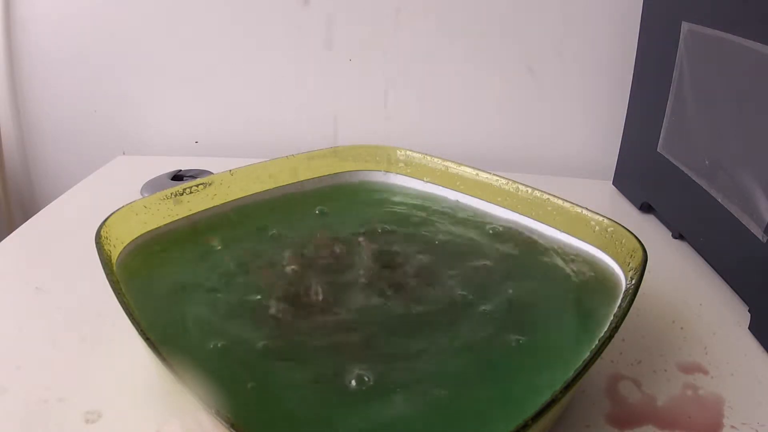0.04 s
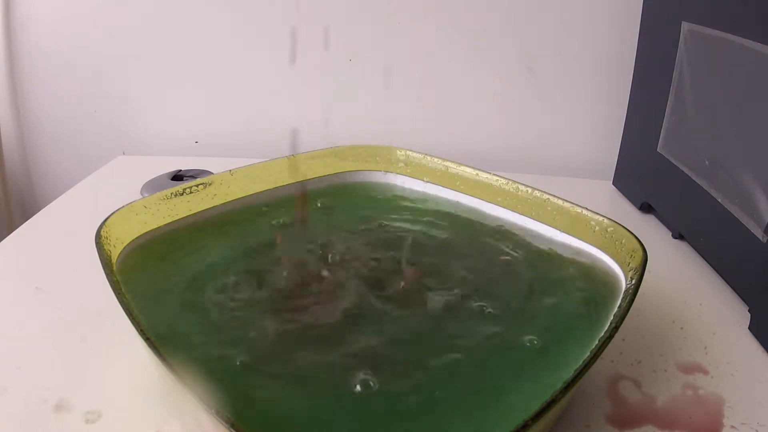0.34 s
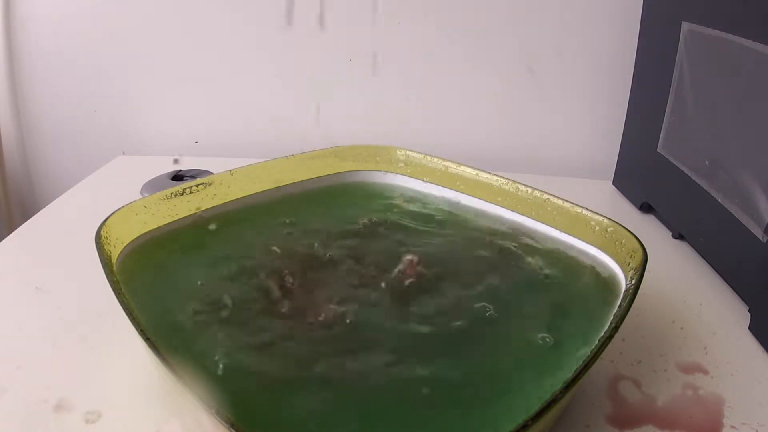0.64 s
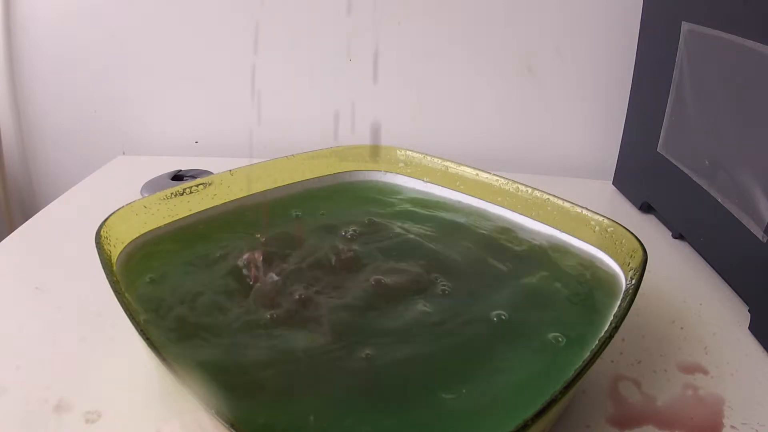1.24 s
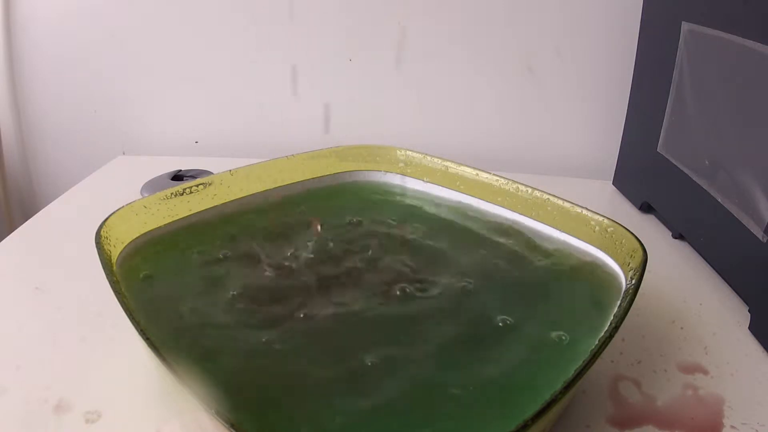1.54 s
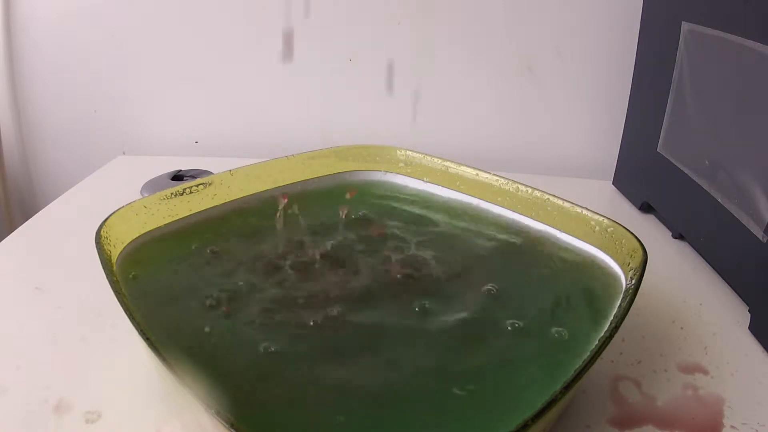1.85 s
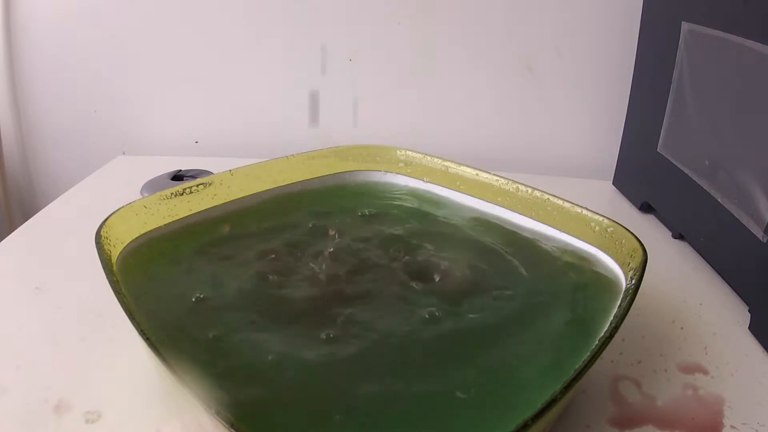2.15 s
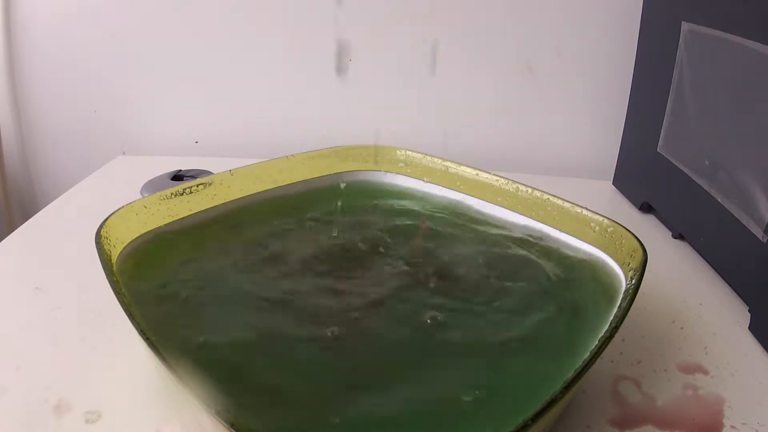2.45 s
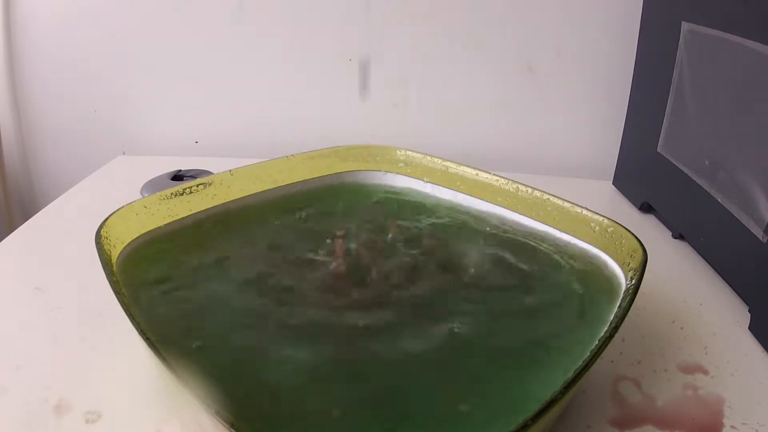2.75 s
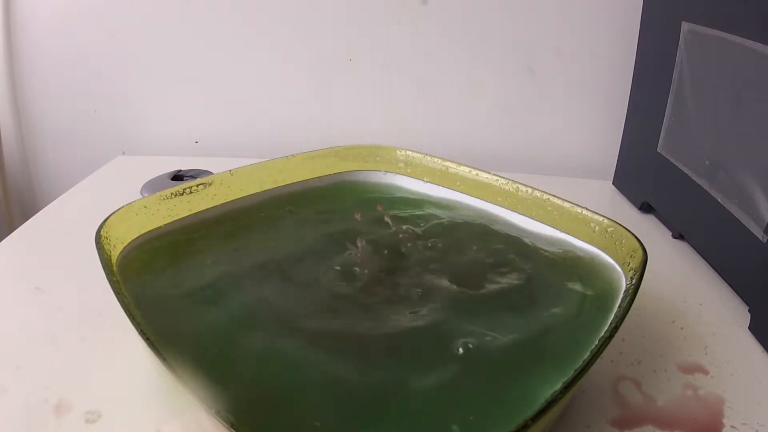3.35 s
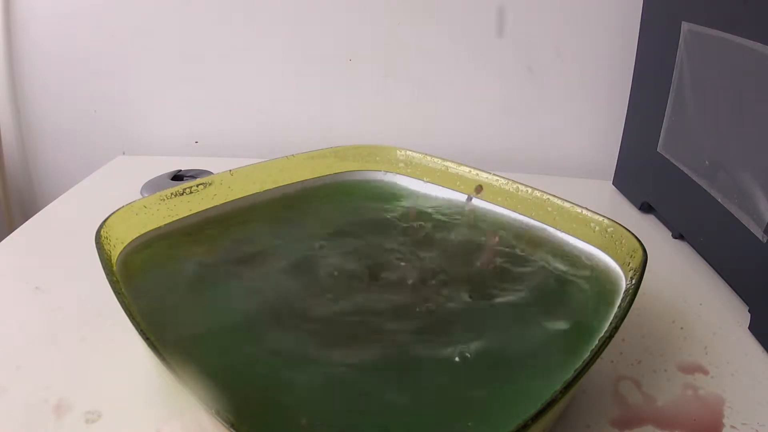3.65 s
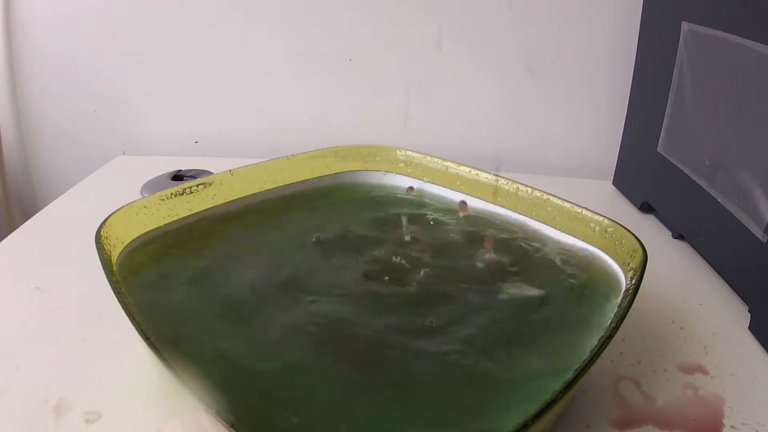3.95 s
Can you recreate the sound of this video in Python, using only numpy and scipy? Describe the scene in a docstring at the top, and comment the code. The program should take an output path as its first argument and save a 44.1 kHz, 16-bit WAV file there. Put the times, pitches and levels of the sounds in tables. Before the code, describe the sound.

Water drops fall into a filled plastic bowl throughout the four seconds, making irregular ticks and short, high plips, many rising in pitch. At about 0.9 seconds one drop hits sharply, much louder, briefly ringing the bowl. Lighter drips continue, standing out near 1.2, 1.9, 2.5 and 2.8 seconds, with fainter plips from splashed droplets between them. The small room rumbles and hisses faintly underneath.

```python
"""Water drops fall into a filled plastic bowl on a table in a small room; one drop hits hard.
Each impact ticks and rings the bowl. Many drops trap an air bubble that plips, its pitch mostly
rising as it nears the surface, and splashed droplets fall back with fainter plips.
The room rumbles and hisses faintly. The recorder holds its samples at a low rate,
which mirrors every plip into the treble."""
import sys
import numpy as np
from scipy import signal
from scipy.fft import rfft, irfft, next_fast_len
from scipy.io import wavfile
from scipy.ndimage import map_coordinates

SR = 44100
rng = np.random.default_rng(int(sys.argv[2]) if len(sys.argv) > 2 else 0)


def wav_out(sig):
    """Save sig, one row per channel (or a flat mono array), as 16-bit PCM at SR to the path in sys.argv[1]."""
    wavfile.write(sys.argv[1], SR, np.round(np.clip(np.atleast_2d(sig).T, -1, 1) * 32767).astype(np.int16))


N = 176400  # 4 seconds


def amp(db):
    """Turn decibels into a factor to multiply a sound by."""
    return 10 ** (np.asarray(db) / 20)


def unit(x):
    """Scale a sound so that its average strength (rms) is 1."""
    return x / np.sqrt(np.mean(x ** 2) + 1e-20)


def gain_at(points, hz):
    """Read the gain at hz from a curve of (frequency [Hz], level [dB]) points."""
    freqs, levels = np.transpose(points)
    return amp(np.interp(np.log(hz + 1), np.log(freqs + 1), levels))


def filtered(x, response):
    """Turn each frequency of x up or down by the gain response(hz)."""
    n = x.shape[-1]
    padded = next_fast_len(n + 8192)
    return irfft(rfft(x, padded) * response(np.fft.rfftfreq(padded, 1 / SR)), padded)[..., :n]


def add(track, start_s, sound):
    """Mix a sound into the track at the given time."""
    part = track[max(round(start_s * SR), 0):][:len(sound)]
    part += sound[:len(part)]


# How wide the room noise is: (frequency [Hz], side level compared with the middle [dB])
NOISE_WIDTH = [(30, -64), (90, -75.5), (180, -41.5), (350, -19), (700, -16), (1500, -13.5), (5000, -7.5)]

def room_noise(spectrum, db):
    """Noise with the given tone colour and level, nearly the same in both ears."""
    middle, side = filtered(rng.standard_normal((2, N)), lambda hz: gain_at(spectrum, hz))
    side = filtered(side, lambda hz: gain_at(NOISE_WIDTH, hz))
    return amp(db) * unit(np.array([middle + side, middle - side]))


# The rumble's tone colour: (frequency [Hz], relative level [dB])
RUMBLE_COLOUR = [(12, -26), (22, -19), (31, -10), (41, 7.5), (50, -6.5), (62, -21.5), (76, -2), (84, -9),
                 (93, -0.5), (110, -9), (144, 0.5), (170, -9), (205, -22.5), (270, -23.5), (305, -21),
                 (340, -26.5), (600, -36), (1000, -46.5), (2000, -56)]
# How loud the rumble is: (time [s], level [dB])
RUMBLE_LOUDNESS = [(0.0, -40), (0.03, -41), (0.28, -46.5), (0.36, -43), (1.08, -46.5), (1.12, -38),
                   (1.18, -47.5), (2.02, -43.5), (2.41, -49), (2.43, -46.5), (3.29, -44), (3.45, -48.5),
                   (3.65, -43.5), (4.0, -44.5)]

def rumble():
    """The room's low rumble, wavering in level."""
    level_db = np.interp(np.arange(N) / SR, *np.transpose(RUMBLE_LOUDNESS))
    return room_noise(RUMBLE_COLOUR, level_db)


# The hiss's tone colour: (frequency [Hz], relative level [dB])
HISS_COLOUR = [(100, -1), (600, 3.5), (1200, 2.5), (2400, -0.5), (4000, -4), (5300, -8), (5900, -15.5),
               (6100, -66)]

def hiss():
    """The room's faint, steady hiss."""
    return room_noise(HISS_COLOUR, db=-70.5)


def in_room(x, echoes_db=-16.5, tail_db=-15, tail_fade_s=0.22):
    """The direct sound, nine echoes off the table and walls, and a short, dull tail."""
    t = np.arange(SR // 4) / SR
    # A fade time, here and below, is how long a sound takes to drop by 60 dB.
    tail = rng.standard_normal(len(t)) * amp(-60 * t / tail_fade_s) * (1 - np.exp(-t / 0.002))
    tail = signal.lfilter(*signal.butter(2, 3570, fs=SR), tail / np.linalg.norm(tail))
    delays = (rng.uniform(0.002014, 0.022, size=9) * SR).astype(int)
    echoes = np.bincount(delays, rng.choice([-1, 1], size=9), len(t))
    room = amp(tail_db) * tail + amp(echoes_db) * echoes / np.linalg.norm(echoes)
    room[0] += 1  # the direct sound
    return signal.fftconvolve(x, room)


def wobble(t, points_per_s=217):
    """A smooth random curve: choppy water jostling a bubble."""
    return map_coordinates(rng.standard_normal(len(t) // 32), [t * points_per_s])


def plip(hz, db, fade_s, rise, max_glide=0.375, swell_cycles=1.01):
    """One air bubble rings: a fading, slightly jostled tone whose pitch glide levels off."""
    t = np.arange(SR // 6) / SR
    glide = max_glide * np.tanh(rise * t / max_glide)  # as a share of the starting pitch
    pitch = hz * (1 + glide + 0.022 * wobble(t))
    swell = 1 - np.exp(-t * hz / swell_cycles)
    fade = amp(db - 60 * t / fade_s + 2 * wobble(t))
    return fade * swell * np.sin(2 * np.pi * np.cumsum(pitch) / SR)


def spray(drops_per_s=13):
    """Faint plips of droplets that splash up and fall back at random."""
    out = np.zeros(N)
    for when, height, strength, lift in rng.random((int(drops_per_s * N / SR), 4)):
        hz = 2720 * 2 ** (height - 0.5)
        db = -69 + 6 * (strength - 0.5)
        add(out, when * N / SR, plip(hz, db, fade_s=0.023, rise=20 * lift))
    return out


# The tones the bowl rings with: (pitch [Hz], relative level [dB], fade time [s])
BOWL_TONES = [(656, -16.5, 0.058), (1046, -11, 0.049), (1143, -8.5, 0.05), (1253, -12, .06),
              (1424, -10, 0.066), (1868, -4.5, 0.065), (2030, -14, 0.058), (2355, -1.5, 0.066),
              (2600, -3, 0.02), (3150, -4.5, 0.03), (3480, -8.5, 0.043), (3630, -20, 0.037),
              (4010, -11.5, 0.045)]

def bowl_ring(t):
    """The struck bowl rings with all its tones, each at a slightly random level."""
    ring = np.zeros(len(t))
    for k, (hz, db, fade_s) in enumerate(BOWL_TONES):
        fade = amp(db + rng.standard_normal() - 60 * t / fade_s)
        ring += (-1) ** k * fade * np.sin(2 * np.pi * hz * t)
    return ring


# Drops hitting the water: (time [s], tick level [dB], centre of the tick's noise [Hz])
DROP_HITS = [ (0.0217, -51, 3120), (0.0782, -56, 2470), (0.125, -59, 2980), (0.266, -51, 5900),
             (.3, -64, 3000), (0.503, -55, 4740), (.5673, -49.5, 3180), (.682, -56, 3000),
             (0.705, -54.5, 3800), (0.726, -55, 2800), (0.8494, -47, 5700), (0.8801, -23.5, 2280),
             (1.114, -56.5, 2540), (1.1634, -58, 3470), (1.2103, -58, 4200), (1.503, -53.5, 5000),
             (1.53, -56, 5240), (1.569, -63, 2680), (1.8218, -60, 2300), (1.875, -57.5, 2500),
             (1.9239, -39, 2510), (1.959, -52, 3870), (2.035, -50.5, 4150), (2.075, -50.5, 5000),
             (2.264, -60, 5200), (2.277, -54, 4060), (2.539, -52, 4740), (2.977, -45, 5550),
             (3.074, -48.5, 3430), (3.123, -56, 3330), (3.2035, -40, 4480), (3.2785, -59, 2370),
             (3.386, -53, 5750), (3.662, -56, 2600), (3.667, -56, 5400), (3.9495, -55.5, 2320)]

def impacts(tick_octaves=0.94, tick_fade_s=0.013, heavy_drop_hz=2550):
    """Each drop ticks on the surface and rings the bowl; small drops tick higher and ring it less."""
    out, t = np.zeros(N), np.arange(SR // 8) / SR
    for start_s, db, hz in DROP_HITS:
        band = signal.butter(2, hz * 2 ** (np.array([-0.5, 0.5]) * tick_octaves), "band", fs=SR)
        tick = signal.lfilter(*band, rng.standard_normal(len(t))) * amp(-60 * t / tick_fade_s)
        tick /= np.abs(tick).max()
        ring_db = -11.5 - 10 * np.log2(hz / heavy_drop_hz)  # 10 dB less for each octave up
        hit = tick + amp(ring_db) * bowl_ring(t)
        add(out, start_s, in_room(amp(db) * hit))
    return out


# Trapped air bubbles; a negative rise makes the pitch fall:
# (time [s], starting pitch [Hz], level [dB], fade time [s], starting rise [share of pitch per s])
TRAPPED_BUBBLES = [ (.001, 1410, -54.5, 0.052, 0), (.022, 3320, -56, .02, 18),
                   (0.077, 2040, -45, 0.0072, 6), (.2243, 2750, -55, 0.039, -1),
                   (0.2992, 2284, -44.5, 0.023, 8), (.3042, 2380, -43.5, 0.029, 3.5),
                   (0.356, 2660, -62.5, .04, 1), (0.367, 2200, -44, 0.0054, 14),
                   (.449, 4024, -48, 0.011, 8), (0.4607, 2115, -55.5, 0.05, 20.5),
                   (0.4695, 2670, -55.5, 0.077, 0), (0.5026, 4150, -46.5, 0.017, -1),
                   (0.505, 2290, -56.5, 0.042, 7), (.677, 1880, -42, 0.041, 48.5),
                   (.6825, 2156, -30.5, 0.014, 55), (0.688, 1290, -58, .1, 0.5),
                   (.7058, 2080, -46, 0.025, -1), (0.7163, 2370, -51, 0.02, 17), (0.727, 2300, -47, .01, 5),
                   (0.731, 1374, -56, 0.096, -0.5), (0.7487, 3180, -53.5, 0.014, 4),
                   (0.777, 1730, -56.5, 0.038, 12), (0.8807, 2345, -20, 0.014, 0),
                   (1.076, 3040, -60.5, 0.04, 3), (1.095, 1180, -61.5, 0.1, 4),
                   (1.1153, 1013, -52, 0.18, 3.7), (1.1267, 2470, -49, 0.057, -1.5),
                   (1.1336, 3370, -50, .024, 2), (1.1455, 1285, -52.5, 0.072, 24),
                   (1.16, 1794, -50.5, 0.13, 7.5), (1.1634, 2150, -37, 0.024, -0.5),
                   (1.2108, 2820, -48, 0.026, 11), (1.3, 2300, -60.5, 0.045, 8),
                   (1.4055, 2470, -57.5, 0.052, 2), (1.501, 2326, -42.5, 0.05, -1.5),
                   (1.5705, 1310, -51.5, 0.053, 1.5), (1.6084, 1865, -61.5, 0.076, 31),
                   (1.8216, 1970, -52, .014, -3), (1.8761, 1307, -54, 0.081, 0),
                   (1.925, 3920, -37.5, 0.0087, 13), (1.9594, 2210, -38.5, .028, -11),
                   (2.034, 2530, -47, 0.016, 15), (2.0817, 2340, -52, 0.029, 0.5),
                   (2.2378, 2366, -41.5, 0.03, 26), (2.2654, 3370, -47.5, 0.027, 7.5),
                   (2.278, 3540, -42, .01, 32), (2.541, 3340, -34, 0.0064, 32),
                   (2.5435, 2770, -50, .033, -4.5), (2.5715, 3790, -56.5, 0.045, 12),
                   (2.586, 3020, -64, .03, 10), (2.8199, 1030, -64, 0.13, 1.5),
                   (2.8308, 2266, -37, 0.039, 17), (2.8525, 2366, -59.5, 0.11, 0),
                   (2.921, 2400, -52, 0.031, 55), (2.9443, 2780, -52, 0.034, -10),
                   (2.9766, 3850, -55, 0.018, -5), (3.1967, 1900, -50, 0.011, 0),
                   (3.2123, 1800, -62, 0.095, 13), (3.284, 1114, -55.5, 0.12, -3.5),
                   (3.298, 1092, -61, 0.24, 2), (3.343, 2114, -52.5, 0.08, 35.5),
                   (3.373, 2420, -53, .019, 6), (3.375, 3780, -54, 0.018, 29),
                   (3.662, 2110, -39.5, 0.013, -10), (3.9195, 3830, -51.5, 0.023, -4),
                   (3.96, 1144, -53, 0.076, 0.5)]

def bubbles():
    """Falling drops trap air under the water, and each bubble plips into the room."""
    out = np.zeros(N)
    for start_s, hz, db, fade_s, rise in TRAPPED_BUBBLES:
        add(out, start_s, in_room(plip(hz, db, fade_s, rise)))
    return out


def scene():
    """The bowl straight ahead, over the room's rumble and hiss."""
    return rumble() + hiss() + bubbles() + impacts() + spray()


def record(dry, hold_hz=12000, top_hz=15150):
    """The recorder holds its samples at a low rate, which mirrors the sound into the treble."""
    # Keep only what lies below about half the hold rate.
    narrow = filtered(dry, lambda hz: 1 / np.sqrt(1 + (hz / (0.48 * hold_hz)) ** 60))
    # Mirror copies appear on both sides of the hold rate and are weakest close to it.
    mirrored = narrow * 2 * np.cos(2 * np.pi * hold_hz * np.arange(N) / SR)
    mirrored = filtered(mirrored, lambda hz: (hz - hold_hz) / np.maximum(hz, hold_hz / 2))
    # Cut off the highest treble.
    return filtered(narrow + mirrored, lambda hz: 1 / np.sqrt(1 + (hz / top_hz) ** 120))


dry = scene()
out = record(dry)
wav_out(out)
```